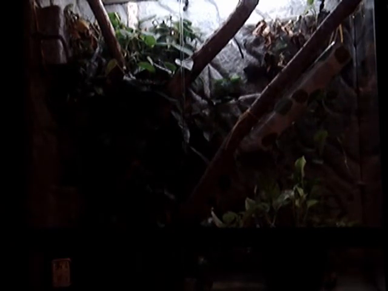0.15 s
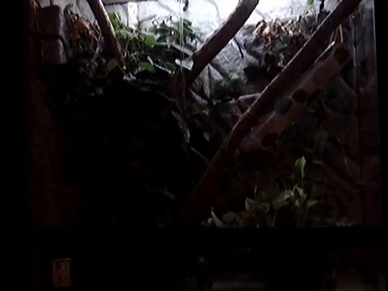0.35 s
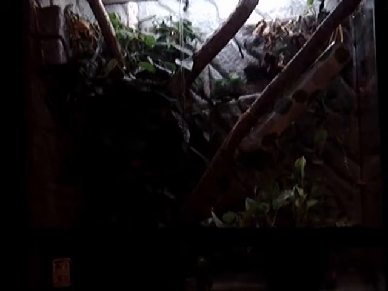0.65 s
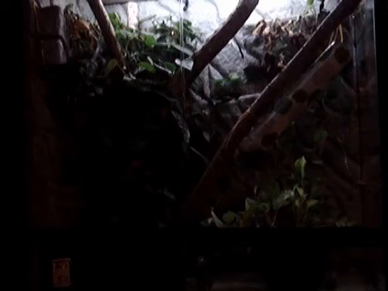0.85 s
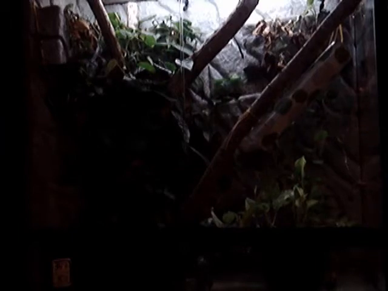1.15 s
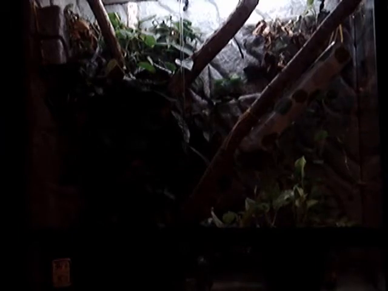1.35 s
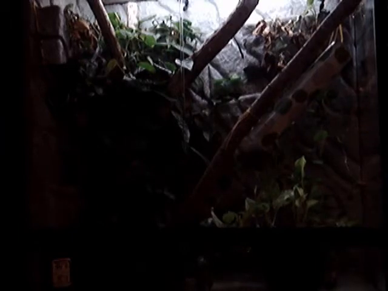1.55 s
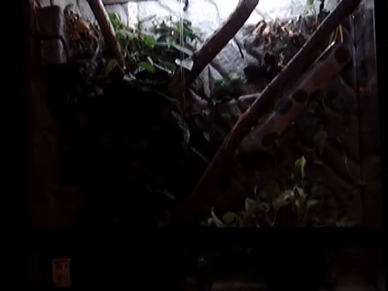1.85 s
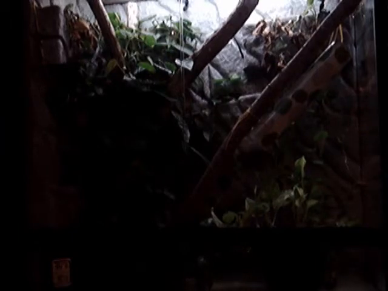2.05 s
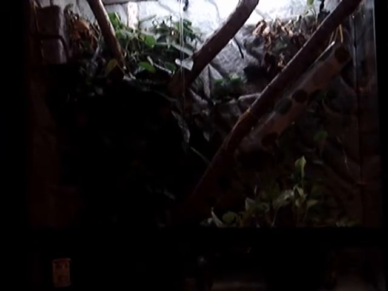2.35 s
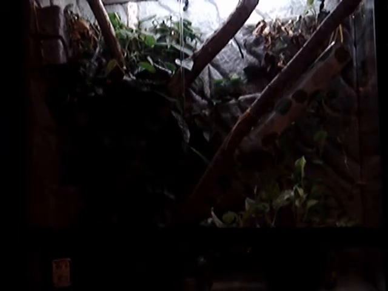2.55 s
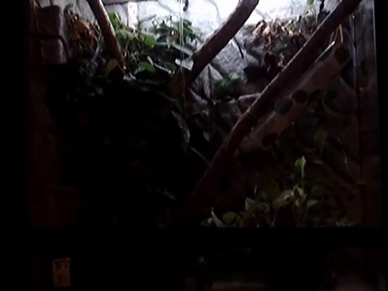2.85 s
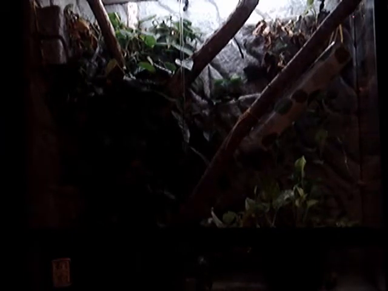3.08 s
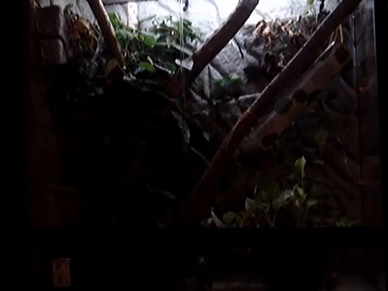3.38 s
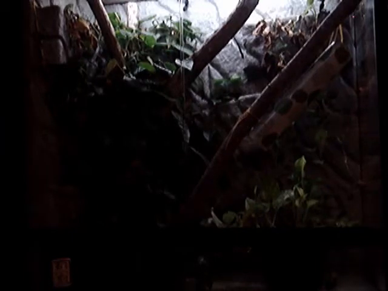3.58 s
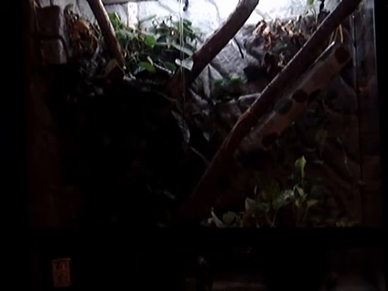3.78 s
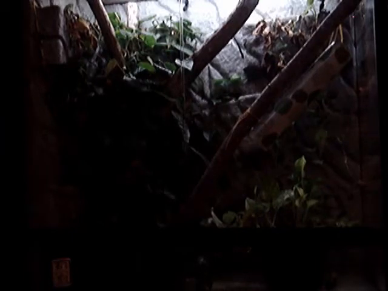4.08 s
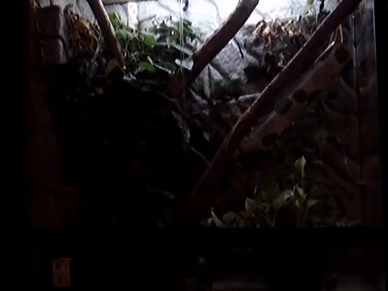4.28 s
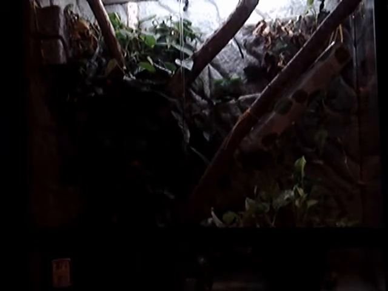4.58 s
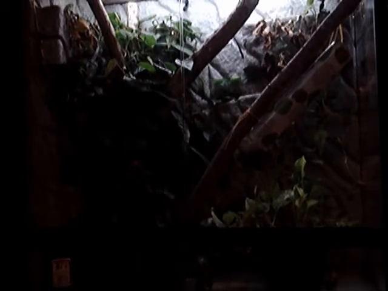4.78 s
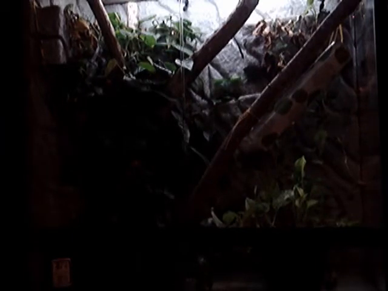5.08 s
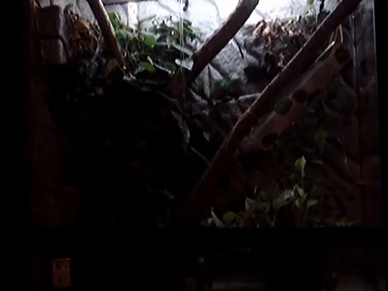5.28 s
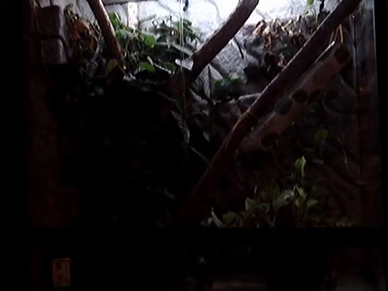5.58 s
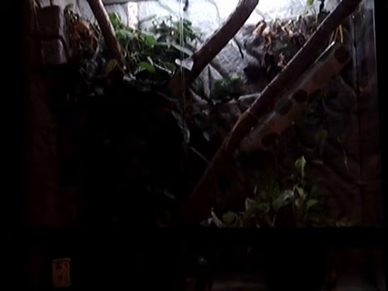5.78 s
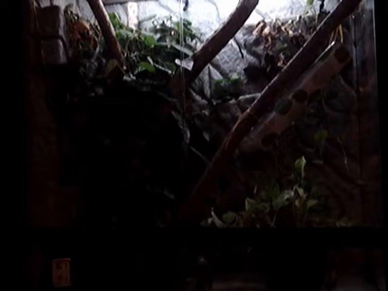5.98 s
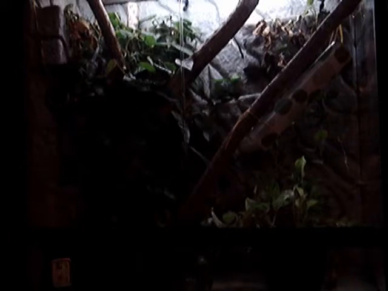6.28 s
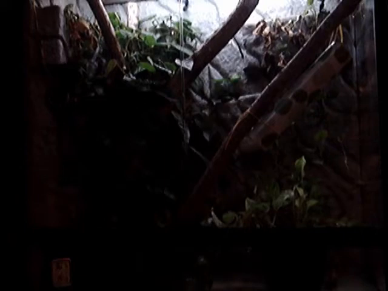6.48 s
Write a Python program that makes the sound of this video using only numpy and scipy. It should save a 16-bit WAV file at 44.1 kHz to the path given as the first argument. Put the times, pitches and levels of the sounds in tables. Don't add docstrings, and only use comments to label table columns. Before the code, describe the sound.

A gecko in a glass tank gives three loud two-part calls, each a bark then a creaking note, over a shimmering cricket trill.

```python
import sys
import numpy as np
from scipy import signal
from scipy.fft import rfft, irfft, next_fast_len
from scipy.io import wavfile
from scipy.ndimage import uniform_filter1d

SR = 44100
rng = np.random.default_rng(int(sys.argv[2]) if len(sys.argv) > 2 else 0)


def wav_record(signal):
    frames = np.transpose(np.atleast_2d(signal))
    bounded = np.clip(frames, -1, 1)
    quanta = np.round(bounded * 32767).astype(np.int16)
    wavfile.write(sys.argv[1], SR, quanta)


def to_linear_factor(level_db):
    exponent = np.asarray(level_db, float) / 20
    return 10 ** exponent


N = 292824

# (start [s], pitch [Hz], effort [dB], stretch of the sag [ratio])
BARKS = [
    (.608, 424.3, -11.5, 0.99),
    (2.688, 415, -12, 0.93),
    (4.748, 414.7, -12, 1.3),
]
# (time after start [s], share of pitch [ratio], roughness [0-1])
BARK_PITCH = [(0, 1.07, .12), (.012, 1, .12), (.035, 1, .13), (.052, .96, .3), (.075, .87, .4),
              (.105, .7, .5), (.14, .5, .15), (.22, .5, .06)]
# (time after start [s], effort [dB], mouth brightness [dB])
BARK_EFFORT = [(0, 0, 5), (.025, -10, 12), (.045, -2, -2.5), (.085, -17, 2), (.14, -36.5, 14.5),
               (.2, -42, 12), (.22, -77, 8.5)]
# (start [s], pitch [Hz], voice break [s], last pulse [s], effort [dB])
NOTES = [
    (.863, 296, 0.95, 1.3025, -12),
    (2.938, 281.9, 2.99, 3.4045, -11),
    (4.998, 270.1, 5.11, 5.5345, -13.5),
]
# (share of the creak [0-1], time added between pulses [ms])
CREAK = [(0, 0), (.09, 4.5), (.55, 17), (.85, 29), (1, 42)]
# (stage [0 start, 1 break, 2 last pulse], effort [dB], mouth brightness [dB])
NOTE_EFFORT = [(0, 0.5, -2.5), (.22, -4, 4.5), (.8, -1.5, -6.5), (1.05, -5, -2), (1.3, -12.5, -1.5),
               (2, -25.5, 0)]
# (frequency [Hz], width [Hz], level [dB])
THROAT = [(563.8, 256, 9), (850, 53, -13.5)]
# (frequency [Hz], width [Hz], level [dB])
MOUTH = [(1577, 240, -4), (2241, 450, 3.5), (2500, 130, -14), (3840, 1500, -15.5), (7104, 410, -24.5)]
# (frequency [Hz], width [Hz], level [dB])
WIDE_JAW = [(361.6, 200, -6.5), (986, 630, -5.5), (1240, 390, -14), (2737, 560, -3), (3074, 680, -10)]
TANK_HZ = [297, 398, 495, 516, 565, 608, 700, 824, 865, 1082, 1180, 1608, 2030, 2094, 2160, 2212, 2339,
           2540, 2654, 2950]
# (level [dB], t60 [s])
TANK_MODES = [(-9.5, 0.39), (1.5, 0.19), (0.5, 0.33), (-5, 0.34), (2, 0.08), (-4, 0.26), (-5.5, 0.28),
              (0, 0.042), (-6, 0.12), (2.5, 0.03), (-7.5, 0.18), (0.5, 0.14), (-1.5, 0.22), (4.5, 0.22),
              (8, 0.063), (5, 0.092), (7, 0.079), (-2.5, 0.098), (-8.5, 0.023), (-1, 0.073)]
# (delay [s], level [dB])
ECHOES = [(.009, -13), (0.0146, -7.5), (0.0198, -12), (.0273, -12.5), (.0331, -10.5)]
# (frequency [Hz], t60 [s])
ROOM_DECAY = [(250, 0.078), (600, 0.28), (2000, 0.2), (4000, 0.033), (8000, 0.054)]
# (time [s], peak level [dB], frequency [Hz])
CHIRPS = [(0.5477, -16.5, 4550), (1.0121, -10.5, 5080), (1.056, -11.5, 5080), (1.5544, -13, 4580),
          (2.2154, -6, 5070), (2.2643, -5.5, 5080), (2.8045, -22.5, 4960), (3.4496, -10.5, 5256),
          (3.7628, -12, 4730), (3.8127, -5.5, 4740), (4.0422, -15, 4980), (4.1315, -6, 5070),
          (4.8628, -20, 4950), (4.9167, -11.5, 4770), (4.9581, -7.5, 5000), (5.5867, -10, 4750),
          (5.7608, -16.5, 5030), (5.8012, -6, 5110), (5.9364, -11, 4900), (6.2073, -9.5, 4770),
          (6.2567, -9.5, 4720)]
# (start [s], length [s], level [dB])
LOW_PHRASES = [(0.009, 0.063, -38), (0.108, 0.072, -40), (0.574, 0.031, -41), (0.838, 0.05, -41.5),
               (1.06, 0.042, -39), (1.374, 0.031, -38.5), (1.436, 0.025, -42.5), (1.515, 0.22, -42.5),
               (2.072, 0.076, -41), (2.208, 0.021, -44), (2.44, 0.1, -40.5), (3.184, 0.017, -40),
               (3.242, 0.24, -39), (3.591, 0.097, -40), (3.718, 0.21, -40), (4.042, 0.15, -41.5),
               (4.241, 0.12, -39), (4.568, 0.095, -43), (4.866, 0.16, -39), (5.239, 0.027, -40.5),
               (5.312, 0.078, -40), (5.532, 0.094, -39), (5.662, 0.028, -41), (5.805, 0.076, -42),
               (6.004, 0.064, -42.5), (6.201, 0.091, -40.5), (6.535, 0.116, -38)]
# (start [s], length [s], level [dB])
HIGH_PHRASES = [(.08, .1, -47), (.37, 0.082, -44.5), (.72, 0.13, -51), (1.012, 0.064, -45.5),
                (1.2, 0.17, -51), (1.53, 0.1, -46.5), (1.8, 0.36, -47.5), (2.215, .16, -45),
                (2.56, 0.38, -50.5), (3.05, 0.18, -54), (3.45, 0.23, -46), (3.85, 0.08, -47),
                (4.13, 0.11, -40), (4.43, 0.2, -46.5), (4.92, 0.097, -40), (5.35, 0.086, -45),
                (5.5, .2, -51.5), (5.8, 0.096, -42), (6.17, 0.095, -46), (6.45, .18, -49.5)]
# (time [s], depth [dB])
LULLS = [(.29, -7.5), (1.15, -6.5), (2.4, -4), (4.01, -9), (4.39, -7), (4.79, -3), (6.15, -5), (6.39, -8)]
# (frequency [Hz], rms level [dB])
HUM = [(60, -79.5), (161.5, -69.5), (350, -73.5), (468.3, -68), (492, -65.5), (576, -66), (1109, -68.5),
       (1346, -71.5), (2019, -69.5), (3230, -73), (7860, -68), (7892, -80)]
# (time [s], level [dB], frequency [Hz], t60 [s])
TAPS = [
    (1.62, -46, 6270, 0.05),
    (6.311, -44, 984, 0.039),
    (6.32, -47.5, 1450, 0.049),
]
# (frequency [Hz], density [dB per Hz])
HISS = [(20, -32.5), (60, -25), (109, -23), (163, -13.5), (404, -17), (484, -12), (680, -16.5),
        (1120, -17.5), (2150, -21.5), (3880, -21.5), (5600, -18.5), (7240, -27), (8500, -27.5),
        (10000, -27.5)]
# (frequency [Hz], likeness [0-1])
LIKENESS = [(60, .965), (150, .97), (400, .99), (2000, .99), (5000, .98), (8000, .88)]
# (frequency [Hz], left minus right [dB])
LEAN = [(60, -.2), (600, -.25), (1100, -1.1), (2200, -1.3), (4800, -.5), (8000, -.2)]
# (frequency [Hz], threshold against the loudest line [dB])
GATE = [(5600, -75), (6500, -62), (8000, -50), (10000, -51), (14300, -54)]

SCOOP, SCOOP_S = .06, .012
SLIP, SLIP_S = .12, .02
ONSET_ROUGH, HELD_ROUGH, BREAK_ROUGH, CREAK_ROUGH = .17, .1, .25, .12
LOW_BED_DB, HIGH_BED_DB = -45, -55
SWELL_S, FADE_S, LULL_S = 0.017, 0.039, 0.033
HISS_DB, PATCH_DB = -51.5, 1.3
EDGE_HZ, CARRIER_HZ = 10050, 12100
FAINTEST_DB = -86


def evened(x):
    return x / np.sqrt(np.mean(x ** 2) + 1e-20)


def read(points, hz):
    f, value = np.transpose(points)
    return np.interp(np.log(hz + 1), np.log(f + 1), value)


def along(rows, t):
    s, *columns = np.transpose(rows)
    return [np.interp(t, s, c) for c in columns]


def add(mix, s, sound):
    part = mix[round(s * SR):][:len(sound)]
    part += sound[:len(part)]


def resonate(x, hz, width):
    return signal.lfilter(*signal.iirpeak(hz, hz / width, SR), x)


def formants(x, table, alternate=False):
    out = 0
    for k, (hz, width, db) in enumerate(table):
        sign = (-1) ** k if alternate else 1
        out = out + sign * to_linear_factor(db) * resonate(resonate(x, hz, width), hz, width)
    return out


def ring(hz, db, t60):
    t = np.arange(SR // 2) / SR
    return to_linear_factor(db - 60 * t / t60) * np.sin(2 * np.pi * hz * t)


def tail(decays, onset=.004):
    hz, t, z = signal.stft(rng.standard_normal(SR // 2), SR, nperseg=128)
    fading = z * to_linear_factor(-60 * t / read(decays, hz)[:, None])
    out = signal.istft(fading, SR, nperseg=128)[1][:SR // 2]
    out = out * (np.arange(SR // 2) > onset * SR)
    return out / np.linalg.norm(out)


def bark(start, pitch_hz, effort_db, stretch):
    t = np.arange(0, BARK_PITCH[-1][0], 1 / SR)
    share, rough = along(BARK_PITCH, t / stretch)
    shape_db, bright_db = along(BARK_EFFORT, t)
    return start + t, 1000 / (pitch_hz * share), rough, effort_db + shape_db, bright_db


def note(start, pitch_hz, breaks, last, effort_db):
    t = np.arange(start, last, 1 / SR)
    stage = np.interp(t, [start, breaks, last], np.arange(3))
    scoop = SCOOP * np.exp(-(t - start) / SCOOP_S)
    slip = SLIP * np.clip(1 + (t - breaks) / SLIP_S, 0, 1)
    gap_ms = 1000 / (pitch_hz * (1 + scoop - slip)) + along(CREAK, stage - 1)[0]
    rough = np.interp(stage, [0, .3, .7, 1, 1.12, 1.35],
                      [ONSET_ROUGH, HELD_ROUGH, HELD_ROUGH, BREAK_ROUGH, BREAK_ROUGH, CREAK_ROUGH])
    shape_db, bright_db = along(NOTE_EFFORT, stage)
    return t, gap_ms, rough, effort_db + shape_db, bright_db


def folds(t, gap_ms, rough, effort_db, bright_db, puff_db=-14, attack=0.0011, closing=0.82):
    shake, air = rng.standard_normal((2, SR))[:, :len(t)]
    rate = 1000 / gap_ms * (1 + .2 * rough * evened(uniform_filter1d(shake, size=150)))
    left = np.cumsum(rate[::-1])[::-1] / SR
    at = np.flatnonzero(np.diff(np.floor(left), append=-1))
    part = np.clip(left[at] % 1 * SR / rate[at], 0, 1)
    size = (1 + rough[at] * air[at]) * np.sqrt(gap_ms[at])
    pulses = np.zeros(len(t) + 1)
    pulses[at] += size * (1 - part)
    pulses[at + 1] += size * part
    pulses[:-1] += to_linear_factor(puff_db) * rough * air * (left % 1) ** 2
    rise = np.minimum((t - t[0]) / attack + 0.033, 1)
    drive = np.append(to_linear_factor(effort_db) * rise, to_linear_factor(effort_db[-1])) * pulses
    bright = drive * to_linear_factor(np.append(bright_db, bright_db[-1]))
    jaw = np.append(gap_ms, gap_ms[-1]) ** -closing
    return t[0], drive, bright, 3 * jaw * drive


def tank():
    modes = sum(ring(hz, *mode) for hz, mode in zip(TANK_HZ, TANK_MODES))
    space = to_linear_factor(-1.5) * modes / np.linalg.norm(modes) + to_linear_factor(-4) * tail(ROOM_DECAY)
    space[0] = to_linear_factor(-4)
    for delay, db in ECHOES:
        space[round(delay * SR)] += to_linear_factor(db)
    return space


def gecko():
    low, high, wide = np.zeros((3, N))
    for controls in [bark(*row) for row in BARKS] + [note(*row) for row in NOTES]:
        s, deep, bright, gape = folds(*controls)
        add(low, s, deep)
        add(high, s, bright)
        add(wide, s, gape)
    voice = formants(low, THROAT) - formants(high, MOUTH, alternate=True) - formants(wide, WIDE_JAW)
    voice = signal.sosfilt(signal.butter(4, 255, "highpass", fs=SR, output="sos"), voice)
    return to_linear_factor(17.5) * signal.oaconvolve(voice, tank())[:N]


def wing(hz, length=0.014, sag=0.074):
    u = np.arange(round(length * SR)) / (length * SR)
    shape = np.sin(np.pi * u ** .7) ** 2
    return shape * np.sin(2 * np.pi * np.cumsum(hz * (1 + sag * (.5 - u))) / SR)


def choir(low_hz, high_hz, strokes_per_s=45, spread_db=0.0, edge_db=-8):
    out = np.zeros(N)
    for hz, off in zip(np.linspace(low_hz, high_hz, num=7), np.linspace(-1, 1, num=7)):
        strokes = rng.random(N) < strokes_per_s / SR
        train = to_linear_factor(spread_db * np.minimum(rng.exponential(1, N), 4)) * strokes
        out += to_linear_factor(edge_db * off ** 2) * signal.oaconvolve(train, wing(hz))[:N]
    out = out + to_linear_factor(-7) * signal.oaconvolve(out, tail([(4000, 0.34), (6000, 0.3)]))[:N]
    return out / np.sqrt(uniform_filter1d(out ** 2, size=6000) + 1e-12)


def phrases(rows, bed_db):
    t, power = np.arange(N) / SR, np.full(N, to_linear_factor(2 * bed_db))
    for start, length, db in rows:
        end = start + length
        shape = np.interp(t, [start - SWELL_S, start, end, end + FADE_S], [0, 1, 1, 0])
        power = power + (to_linear_factor(db) * shape) ** 2
    return np.sqrt(power)


def crickets():
    out = phrases(LOW_PHRASES, LOW_BED_DB) * choir(4360, 5080)
    out = out + phrases(HIGH_PHRASES, HIGH_BED_DB) * choir(4950, 5470)
    t = np.arange(N) / SR
    out = out * to_linear_factor(sum(db * np.exp(-((t - s) / LULL_S) ** 2) for s, db in LULLS))
    for s, db, hz in CHIRPS:
        add(out, s - .004, to_linear_factor(db - 19.5) * wing(hz, length=0.019))
    return out


def machines(waver=0.47):
    t, out = np.arange(N) / SR, np.zeros(N)
    for hz, db in HUM:
        drift = evened(uniform_filter1d(rng.standard_normal(N), size=4000))
        out += to_linear_factor(db + 4) * (1 + waver * drift) * np.sin(2 * np.pi * hz * t + waver * drift)
    for s, db, hz, t60 in TAPS:
        add(out, s, ring(hz, db, t60) * (1 + 1.2 * rng.standard_normal(SR // 2)))
    return out


def room():
    frames, hz = N // 256 + 5, np.fft.rfftfreq(1024, 1 / SR)
    a, b, c, d, patches = rng.standard_normal((frames, 513, 5)).T
    patches = uniform_filter1d(patches, size=10, axis=0)
    patches = evened(uniform_filter1d(patches, size=12, axis=1))
    same = np.clip(read(LIKENESS, hz), -1, 1)[:, None]
    left = a + 1j * b
    right = same * left + np.sqrt(1 - same ** 2) * (c + 1j * d)
    z = np.array([left, right]) * to_linear_factor(read(HISS, hz)[:, None] + PATCH_DB * patches)
    return to_linear_factor(HISS_DB) * evened(signal.istft(z, nperseg=1024, noverlap=768)[1][:, :N])


def scene():
    song = crickets()
    near = gecko() + song + machines()
    size = next_fast_len(N)
    lean_db = read(LEAN, np.fft.rfftfreq(size, 1 / SR)) / 2
    ports = irfft(rfft(near, size) * to_linear_factor([lean_db, -lean_db]), size)[:, :N]
    echo = to_linear_factor(-30.5) * np.outer([1, -1], np.roll(song, shift=300))
    return ports + room() + echo


def gated(x):
    hz, _, z = signal.stft(x, SR, nperseg=2048)
    size = abs(z.mean(0))
    threshold = size.max(0) * to_linear_factor(read(GATE, hz))[:, None]
    keep = (size > threshold) | (hz[:, None] < GATE[0][0])
    keep = keep & ((size > to_linear_factor(FAINTEST_DB)) | (hz[:, None] < CARRIER_HZ))
    return signal.istft(z * keep, SR, nperseg=2048)[1][:, :N]


def top_cut(x):
    return signal.sosfilt(signal.butter(12, 15070, fs=SR, output="sos"), x)


def record(dry):
    power_db = 10 * np.log10(abs(uniform_filter1d((dry ** 2).mean(0), size=400)) + 1e-12)
    fall = np.arange(N) * 60. / SR
    over_db = np.maximum(np.maximum.accumulate(power_db + fall) - fall + 18.5, 0)
    x = dry / to_linear_factor(0.035 * uniform_filter1d(over_db, size=200))
    x = 1.354 * np.tanh(x / 1.229) + to_linear_factor(-26.5) * x ** 2
    images = to_linear_factor(-37.5) * x * np.cos(2 * np.pi * CARRIER_HZ * np.arange(N) / SR)
    band = signal.butter(6, [14120, 14520], "bandpass", fs=SR, output="sos")
    upper = signal.sosfilt(band, images)
    lowpass = signal.firwin(511, EDGE_HZ, window=("kaiser", 10), fs=SR)
    x = signal.oaconvolve(x + images, lowpass[None], "same")
    return top_cut(gated(x + upper))


dry = scene()
out = record(dry)
wav_record(out)
```